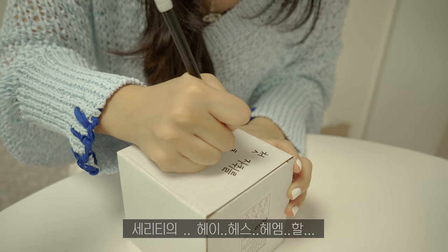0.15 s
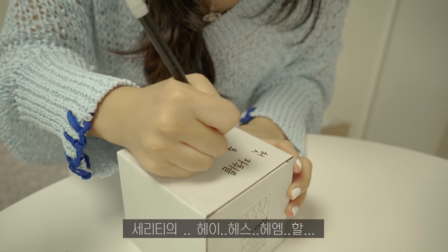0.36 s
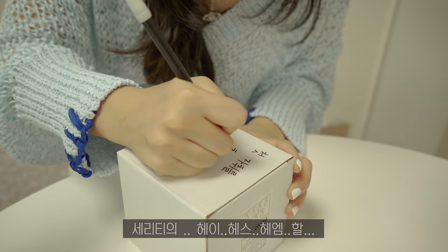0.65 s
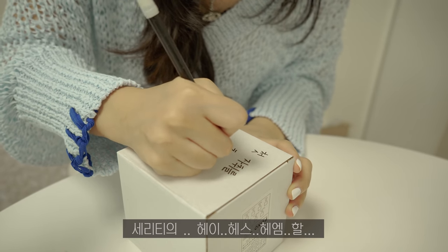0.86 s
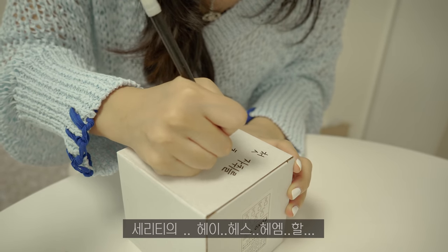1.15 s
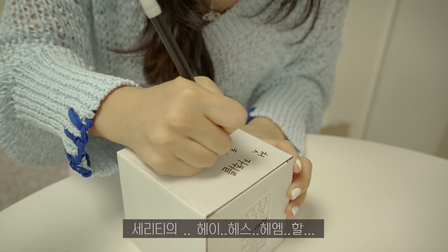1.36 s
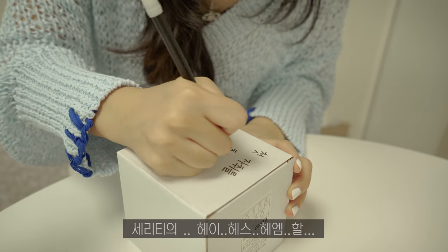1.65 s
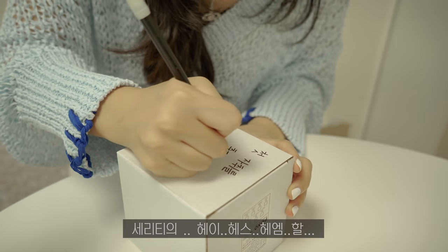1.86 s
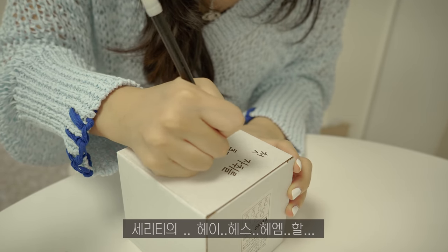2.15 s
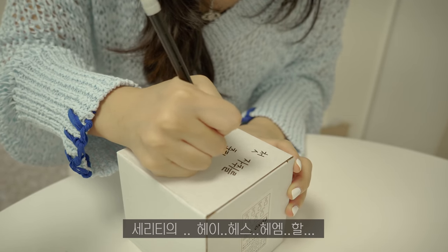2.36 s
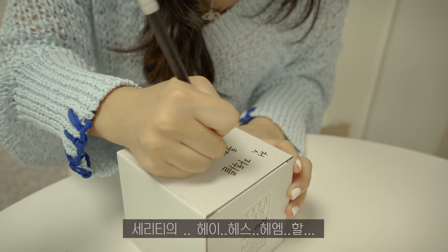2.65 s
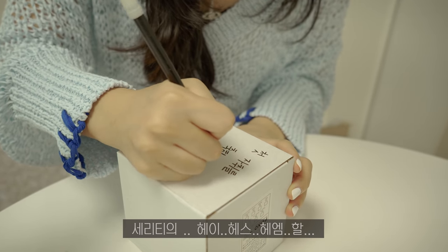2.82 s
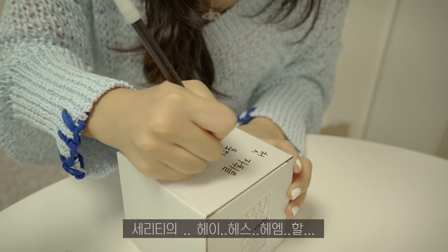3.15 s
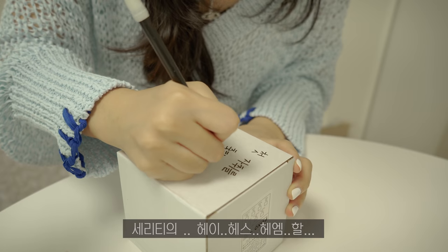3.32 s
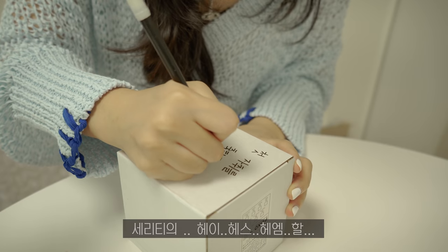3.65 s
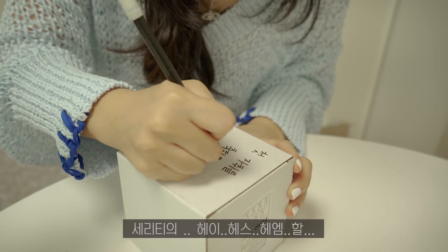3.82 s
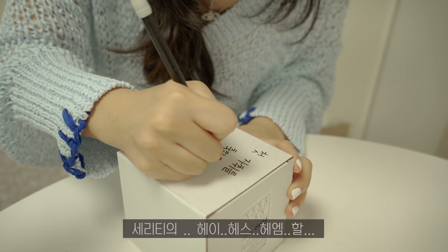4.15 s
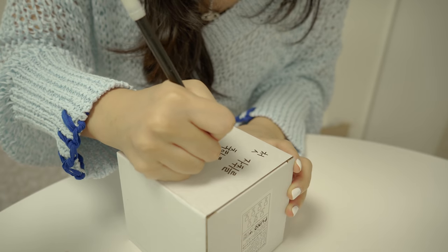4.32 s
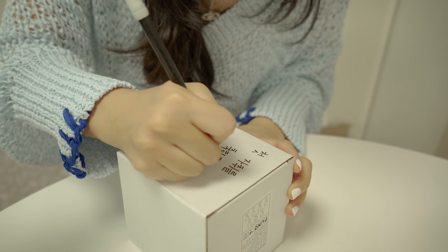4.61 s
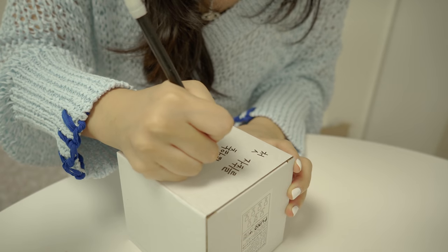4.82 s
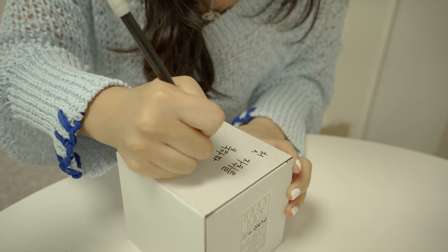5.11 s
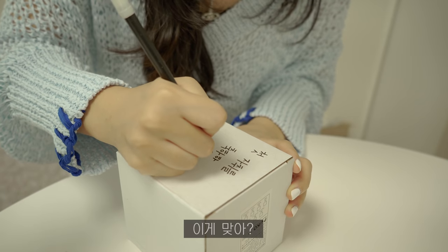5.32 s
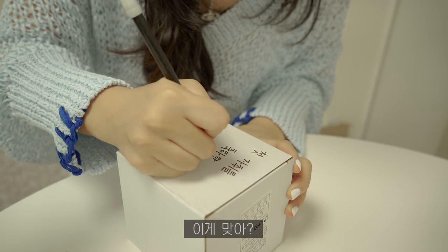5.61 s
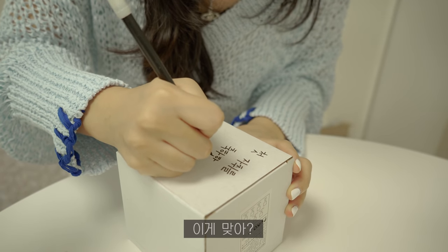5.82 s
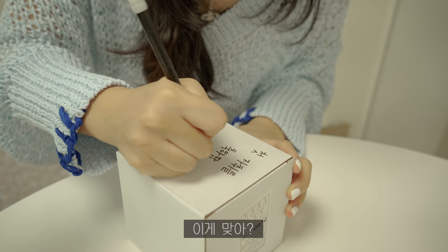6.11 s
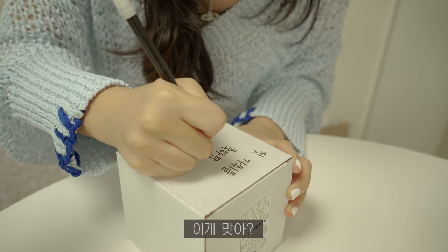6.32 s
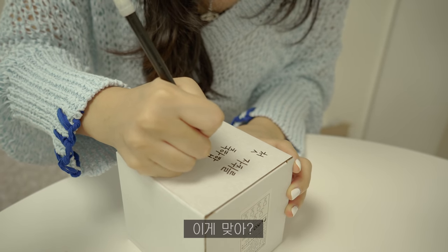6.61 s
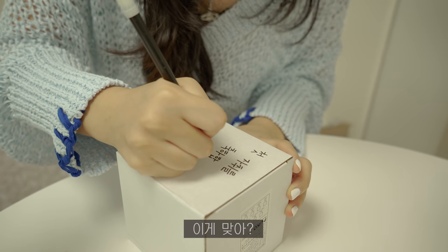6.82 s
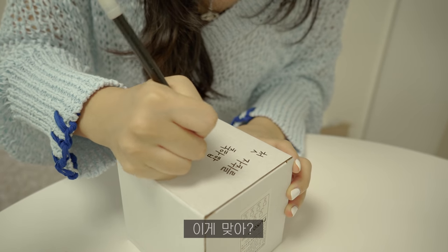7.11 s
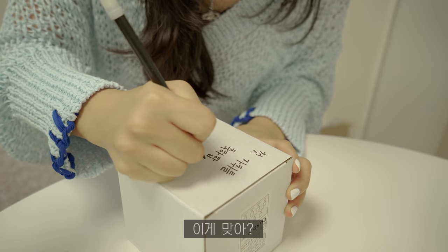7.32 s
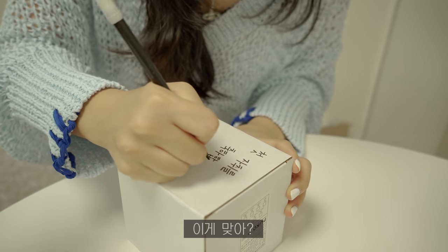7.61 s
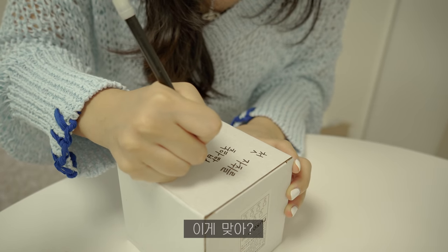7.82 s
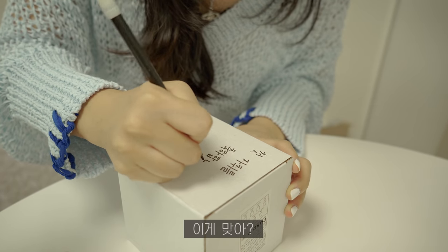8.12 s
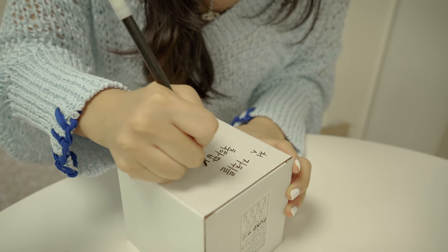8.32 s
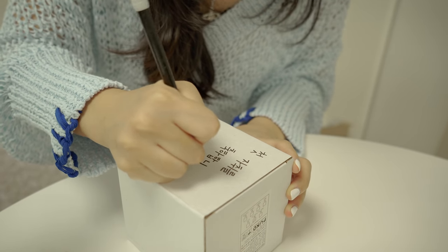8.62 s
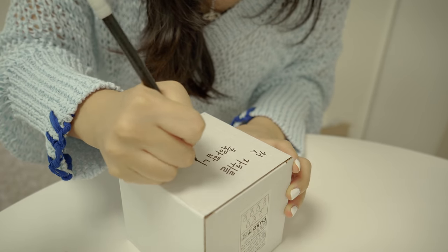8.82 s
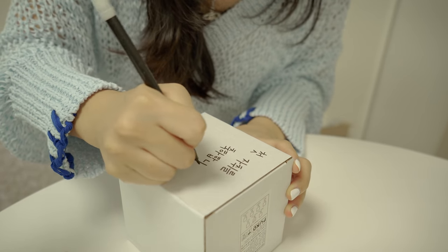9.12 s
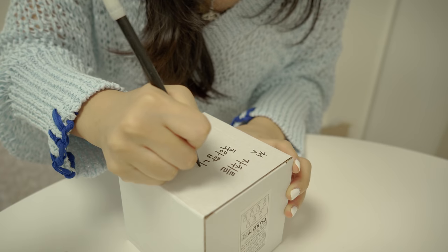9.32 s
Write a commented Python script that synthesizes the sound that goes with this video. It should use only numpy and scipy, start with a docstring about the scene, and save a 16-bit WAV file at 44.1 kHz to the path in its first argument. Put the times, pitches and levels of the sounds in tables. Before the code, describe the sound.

A felt pen scratches short, dry, separated strokes on a small cardboard box, with soft nib taps, hand rustles and low table thumps in a quiet room.

```python
"""A felt pen scratches in short strokes on the lid of a small cardboard box, close to two microphones.
The nib lands with soft taps, then catches on the fibres in dense slips; both ring the modes of the box.
In places the hand hisses and drags along the lid, and tiny dry ticks stand out, all with a short room tail.
Each push rocks the table with a low tone; behind it lie a murmur of air, hiss and a faint wavering hum."""
import sys
import numpy as np
from scipy import signal
from scipy.fft import rfft, irfft, next_fast_len
from scipy.io import wavfile
from scipy.ndimage import uniform_filter1d

SR = 44100
rng = np.random.default_rng(int(sys.argv[2]) if len(sys.argv) > 2 else 0)


def attenuation_scalar(level_db):
    """Turn a level in dB into a linear amplitude multiplier (20 dB per decade)."""
    decades = np.asarray(level_db, float) / 20
    return 10 ** decades


def file_out(sig):
    """Save sig as 16-bit WAV at sys.argv[1]."""
    # one column per channel
    cols = np.atleast_2d(sig).T
    # limit, then scale
    lim = np.clip(cols, -1, 1)
    pcm = np.round(lim * 32767).astype(np.int16)
    wavfile.write(sys.argv[1], SR, pcm)


N = 417186
T = np.arange(N) / SR
LEFT_RIGHT = np.array([[1], [-1]])  # plus for the left microphone, minus for the right


def level(x, db):
    """Scale to an rms level in dB."""
    return x * attenuation_scalar(db) / np.sqrt(np.mean(x ** 2))


def colour(x, points):
    """Shape a spectrum by (Hz, dB) points, joined by straight lines over log frequency."""
    hz, db = np.transpose(points)
    size = next_fast_len(N)
    bins = np.maximum(np.arange(size // 2 + 1) * SR / size, 1)
    gain_db = np.interp(np.log(bins), np.log(hz), db)
    return irfft(rfft(x, size) * attenuation_scalar(gain_db), size)[..., :N]


def ring(x, hz, width):
    """One mode as a complex ring, gain 1 at its centre; a narrower width in Hz rings longer."""
    pole = np.exp((2j * hz - width) * np.pi / SR)
    return signal.lfilter([1 - abs(pole)], [1, -pole], x)


def walk(rate):
    """A slow random wander: a new level every 1 / rate seconds, joined by slopes; spread near 1."""
    k = int(SR / rate)
    held = np.repeat(rng.standard_normal(N // k + 1), k)
    return uniform_filter1d(held, k)[:N]


def nib():
    """Pressure as gain, speed 0-1 and broad side 0-1 over time; speed arches over each stroke."""
    # Strokes: the nib bites at once, leans from a first to a last pressure and lifts.
    # Each row: start in seconds, length in seconds, first and last pressure in dB, top speed from 0 to 1.
    stroke_rows = [(0.064, 0.074, -42, -52.5, 0.85), (0.215, 0.072, -35.5, -34.5, 0.74),
                   (0.854, 0.059, -43.5, -41, 0.93), (1.156, 0.067, -45.5, -38.5, 0.88),
                   (1.538, 0.037, -46.5, -36.5, 0.68), (1.717, 0.019, -32, -28, 0.47),
                   (1.761, 0.027, -44, -52, .4), (2.176, 0.16, -45.5, -35.5, 0.8),
                   (2.642, 0.057, -32, -44.5, 0.54), (3.428, 0.057, -40.5, -53.5, 0.77),
                   (3.74, 0.06, -42.5, -50.5, 0.74), (4.096, .045, -51, -44, 0.33),
                   (4.175, 0.022, -58, -51.5, 0.23), (4.287, 0.064, -42.5, -54, 0.26),
                   (4.718, 0.091, -44, -41, 0.73), (5.021, 0.065, -40.5, -46.5, 0.47),
                   (5.686, 0.067, -43.5, -41, .6), (6.059, .12, -52.5, -41, 0.43),
                   (6.546, 0.043, -40.5, -37, .3), (7.043, 0.069, -36.5, -44, 0.11),
                   (7.836, 0.087, -46, -45, 0.64), (8.022, 0.036, -33.5, -41.5, 0.77),
                   (8.47, 0.15, -36.5, -41, 0.6), (8.594, 0.077, -42.5, -39, 0.08),
                   (8.694, 0.044, -39.5, -51, 0.17), (9.408, 0.041, -38, -47, 0.61)]
    # Jerks: the nib sticks and jerks free.
    # Each row: start in seconds, length in seconds, first pressure in dB, top speed from 0 to 1.
    jerk_rows = [(1.47, 0.017, -36, 0.18), (1.498, 0.045, -46, 0), (1.628, 0.013, -41.5, 0),
                 (1.647, 0.011, -41, 0.3), (1.664, 0.011, -36.5, 0.15), (1.685, 0.014, -33, 0.28),
                 (1.705, 0.0073, -33, 0.4), (4.056, 0.015, -37, 0.16), (4.08, 0.0087, -51, 0.2),
                 (4.222, .014, -56, .3), (4.241, 0.011, -51, 0.45), (4.256, 0.024, -49.5, 0.35),
                 (8.006, 0.013, -29.5, 0.1), (8.12, .025, -57, 0.5)]
    stroke_lift_db_per_s, jerk_lift_db_per_s, jerk_sag_db = 545, 1500, 7.5
    bite_s, lift_slowing_s = 0.0029, 0.06
    speed_at_ends, speed_late = 0.64, 1.11  # share of top speed; over 1 = the peak comes late
    bite_speed, bite_fade_s = 0.16, 0.0057  # the break-away is quick
    broad_from_s, broad_full_s = 0.055, 0.11  # long strokes drag the nib's broad side
    slow_judder_db, slow_judder_hz = 2.5, 109.9

    rows = [(*row, stroke_lift_db_per_s) for row in stroke_rows]
    rows += [(s, length, db, db - jerk_sag_db, top, jerk_lift_db_per_s) for s, length, db, top in jerk_rows]
    gain, moving, sideways = np.zeros((3, N))
    for s, length, first_db, last_db, top, lift in rows:
        part = slice(int(s * SR), int((s + length + 50 / lift) * SR))
        t = T[part] - s
        along = np.clip(t / length, 0, 1)
        after = np.maximum(t - length, 0)
        press = attenuation_scalar(first_db) + (attenuation_scalar(last_db) - attenuation_scalar(first_db)) * along
        press = press * np.clip(t / bite_s, 0, 1) * attenuation_scalar(-lift * after)
        gain[part] += press
        # speeds are averaged by pressure where strokes overlap
        arch = np.abs(np.sin(np.pi * along ** speed_late))
        stroke_speed = top * (speed_at_ends + (1 - speed_at_ends) * arch)
        moving[part] += press * stroke_speed * np.exp(-after / lift_slowing_s)
        moving[part] += press * bite_speed * np.exp(-t.clip(0) / bite_fade_s)
        sideways[part] += press * np.clip((length - broad_from_s) / (broad_full_s - broad_from_s), 0, 1)
    broad = sideways / (gain + 1e-9)
    speed = moving / (gain + 1e-9)
    # a slow nib moves in fits
    fits_db = slow_judder_db * np.clip(1 - 2 * speed, 0, 1) * walk(slow_judder_hz)
    return gain * attenuation_scalar(fits_db), speed, broad


def slips(rate, spread_db, judder_db, judder_rate):
    """Fibres let go at random, rate times a second, mostly weakly and a few hard, in juddering bursts."""
    chance = rng.random((3, N))
    lets_go = chance[0] < rate / SR
    size = attenuation_scalar(-spread_db * np.log(chance[1] + 1e-9)) * np.sign(chance[2] - 0.5)
    return level(lets_go * size * attenuation_scalar(judder_db * walk(judder_rate)), 0)


def taps():
    """The nib lands, lifts or snags: half-sine pushes; a longer contact sounds duller."""
    # Each row: start in seconds, strength in dB before the box, contact time in milliseconds.
    tap_rows = [(0.025, -40, 0.88), (0.405, -57, 0.39), (0.815, -41.5, 0.75), (1.111, -42.5, 0.82),
                (1.441, -45, 0.84), (1.65, -38, 0.36), (1.655, -50, 0.53), (1.71, -44, 0.74),
                (1.731, -41, 0.48), (1.739, -43, 0.74), (2.122, -43.5, 0.93), (2.567, -51, 0.83),
                (2.611, -48, 0.81), (2.877, -52, 0.8), (3.374, -42, 0.9), (3.701, -42, 0.97),
                (4.01, -45, 1), (4.225, -40, 0.51), (4.245, -45, 0.65), (4.263, -39.5, 0.69),
                (4.658, -44, 1), (4.981, -42, 0.98), (5.182, -45.5, 0.57), (6.977, -56, 0.76),
                (7.204, -45, 0.65), (7.798, -45, 0.92), (8.118, -41, 0.47), (8.407, -46.5, 0.89),
                (8.698, -30, 0.44), (8.745, -39, 0.66), (8.765, -41, 0.49), (9.355, -43, 1)]
    force = np.zeros(N)
    for s, db, ms in tap_rows:
        n = ms * SR / 1000
        push = np.sin(np.pi * (np.arange(int(n)) + 0.5) / n)
        start = int(s * SR)
        force[start:start + len(push)] += attenuation_scalar(db + 37.0) * push / push.sum()
    return force


def box():
    """Slips and taps ring the same modes; each microphone hears each mode from its own side."""
    # The ways the box rings. Each row: frequency in Hz, width in Hz, level in dB, change in dB as the
    # writing crosses the lid, left minus right in dB, left phase lead in radians.
    mode_rows = [(247, 75, -1, -1, -2, 1), (263, 40, 2.5, -1.5, 3, 1), (353, 110, -7.5, -5, -13, 0.86),
                 (455, 67, -3.5, -3, -0.5, -0.025), (551.4, 58, 2, 0.5, -13, -0.4), (673, 50, -9, 0, -4, 1),
                 (853, 52, 1, 3, -21, 0.19), (911, 60, -1, -4, -12, -1.05),
                 (927, 42, -3.5, -6, -8.5, -0.89), (976, 52, -1.5, -2, -4, -0.17),
                 (1150, 60, -8, -22, -1, -0.1), (1226, 96, -3.5, 15, -5, -0.4),
                 (1318, 104, -3, 14.5, -7.5, -0.37), (1448, 146, 4, 1.5, -2.5, -0.12),
                 (1573, 100, -5, 0, 5, -0), (1700, 112, -4, -19.5, -2, -.2), (1830, 81, -5.5, -5, -4, 0.44),
                 (1970, 160, -5, 8, -8, 0.45), (2170, 220, -8, -13.5, -11, 0.3),
                 (2500, 110, -14, -23, -7, 0.17), (2590, 500, -9, -25, -14, 0.21),
                 (3150, 130, 1, 1, -4, -0), (3370, 225, 0, 4, -8, 0.3), (3726, 270, 0.5, 11, -8, 0.47),
                 (4580, 610, 7.5, -6.5, 1.5, 0.32), (5400, 620, 3.5, 2, -7.5, -0.83),
                 (6220, 1030, -5.5, 10, -10, -0.096), (7600, 1500, -2, 3, -4, 0.98),
                 (11000, 2100, -13, 0, -8, -0.68)]
    # Families of modes, from boom to fizz.
    # Each row: lowest and highest frequency in Hz, scratch drive in dB, tap drive in dB.
    family_rows = [(167, 320, 22, -1.5), (333, 583, 24.5, 0.5), (708, 2513, 11.5, -4.5),
                   (2607, 3810, 11, -0.5), (4130, 12400, 4.5, -5)]
    gain, speed, broad = nib()

    def by_speed(rest, full, side):
        """A setting for the nib at rest, at full speed, and what its broad side adds."""
        return rest + (full - rest) * speed + side * broad

    boom_db, sag_db = by_speed(-13.5, -27, -6), by_speed(-15.5, -25, 7)
    tilt_db_per_oct = by_speed(-8, 11, -4.5)
    rasp_db, fizz_db = by_speed(-29.5, -3, 0.5), by_speed(-32.5, -9.5, 1)
    # the middle family has no shared level: there the tilt sets each mode's drive
    shares = (boom_db, sag_db, None, rasp_db, fizz_db)

    scratch = gain * slips(6000.0, 1.8, 1.67, 120.0)
    blows = taps()
    out = 0
    for (lo_hz, hi_hz, scratch_db, tap_db), share_db in zip(family_rows, shares):
        family = 0
        for hz, width, mode_db, cross_db, side_db, lead in mode_rows:
            if not lo_hz < hz < hi_hz:
                continue
            # a faster nib excites the upper lid modes more
            drive_db = tilt_db_per_oct * np.log2(hz / 1200) if share_db is None else share_db
            # it also wanders over each mode's pattern
            drive_db = scratch_db + drive_db + 1.8 * walk(9)
            drive = scratch * attenuation_scalar(drive_db) + attenuation_scalar(tap_db) * blows
            crossing = attenuation_scalar(cross_db * (T / T[-1] - 0.5))
            mode = ring(drive * crossing, hz, width)
            ear_gain = attenuation_scalar(mode_db + LEFT_RIGHT * side_db / 2)
            ear_phase = np.exp(0.5j * lead * LEFT_RIGHT)
            family = family + (ear_gain * ear_phase * mode).imag
        # each family is band-passed, so it sounds only within its own range
        band = signal.butter(4, [lo_hz, hi_hz], "band", fs=SR, output="sos")
        out = out + signal.sosfilt(band, family)
    # the lid also gives as a whole under each tap: one short puff
    puff = signal.lfilter(*signal.butter(2, [200, 1500], "band", fs=SR), blows)
    return out + attenuation_scalar(-23.0 - 1.0 * LEFT_RIGHT) * puff


def hand():
    """Skin hisses over the paper face; the box is dragged a little as the hand breaks loose."""
    # Each row: start in seconds, length in seconds, skin hiss in relative dB, dull drag in relative dB.
    slide_rows = [(0.4, 0.072, -58, -48), (1.859, 0.053, -67, -73), (2.766, 0.089, -59.5, -50),
                  (4.418, 0.087, -73, -74), (5.172, 0.14, -65.5, -51.5), (7.196, 0.093, -64, -47.5),
                  (7.365, 0.049, -71.5, -80), (8.829, 0.082, -65.5, -55), (8.99, 0.075, -73.5, -76)]
    # Tone of the skin hiss. Each row: frequency in Hz, relative level in dB.
    skin_shape = [(400, -20), (800, 2), (1500, 5), (2300, 3.5), (3000, -4.5), (4400, 0.5), (6500, -4),
                  (9000, -0.5), (11500, 0), (13500, -8), (15600, -15.5)]
    drag_shape = [(40, -22), (70, 8.5), (110, 2), (160, -3.5), (250, 4.5), (400, -8), (800, -28.5)]
    early, edge = 0.66, 0.8  # below 1: the hiss peaks early and its ends are steeper
    rise_s, fall_db_per_s = 0.0084, 320

    hissing, dragging = np.zeros(N), np.zeros(N)
    for s, length, hiss_db, drag_db in slide_rows:
        part = slice(int(s * SR), int(s * SR) + SR // 2)
        t = np.maximum(T[part] - s, 0)
        swell = np.abs(np.sin(np.pi * np.minimum(t / length, 1) ** early)) ** edge
        hissing[part] += attenuation_scalar(hiss_db) * swell
        fading_db = drag_db - fall_db_per_s * np.maximum(t - rise_s, 0)
        dragging[part] += np.minimum(t / rise_s, 1) * attenuation_scalar(fading_db)
    near = slips(14000.0, 1.3, 3.0, 90.0) + 0.15 * LEFT_RIGHT * rng.standard_normal(N)
    hiss = level(colour(near, skin_shape), 6.06) * attenuation_scalar(-4.8 * LEFT_RIGHT)
    rumble = rng.standard_normal(N) + 0.76 * LEFT_RIGHT * rng.standard_normal(N)
    drag = level(colour(rumble, drag_shape), 0.33)
    return hissing * hiss + dragging * drag


def ticks():
    """Tiny dry ticks: short noise puffs through two broad rings, a few cycles each."""
    # Each row: start in seconds, peak in dB midway between left and right, centre frequency in Hz.
    tick_rows = [(1.367, -42, 6600), (1.5579, -50, 7120), (1.87, -42, 8800), (2.4495, -49, 9200),
                 (4.486, -52, 10200), (6.2018, -51, 11830), (9.0194, -60, 5400), (1.3555, -48, 8500),
                 (0.4962, -47.5, 1800), (7.2918, -44, 1740), (7.5635, -53, 1830)]
    out = np.zeros(N)
    t = np.arange(300) / SR
    noise = rng.standard_normal((len(tick_rows), len(t)))
    for (s, db, hz), puff in zip(tick_rows, noise):
        once = ring(puff * np.exp(-t / 0.0014), hz, 0.51 * hz)
        burst = ring(once, hz, 0.6 * hz).real
        start = int(s * SR)
        out[start:start + len(t)] += attenuation_scalar(db) * burst / abs(burst).max()
    return out * attenuation_scalar(-1.5 * LEFT_RIGHT)


def room(x, t60_s, wet_db, dull_hz):
    """A short diffuse tail of fading noise, different at each microphone."""
    t = np.arange(SR // 2) / SR
    tail = rng.standard_normal((2, len(t))) * attenuation_scalar(-60 * t / t60_s) * (t > 0.004)
    tail = signal.lfilter(*signal.butter(1, dull_hz, fs=SR), tail)
    tail = tail / np.sqrt((tail ** 2).sum(axis=1, keepdims=True))
    middle = x.mean(axis=0, keepdims=True)
    return x + attenuation_scalar(wet_db) * signal.oaconvolve(middle, tail, axes=1)[:, :N]


def table():
    """A low tone swells with each push and dies away; it comes through the stands, out of step."""
    # Pushes that rock the table on its legs. Each row: time in seconds when the swell reaches full level,
    # frequency in Hz, relative level in dB, hold in seconds.
    push_rows = [(0.08, 32.4, -42.5, .03), (0.207, 32.2, -56, .09), (0.42, 33, -54, 0.074),
                 (0.56, 32.1, -58, 0.048), (0.872, 31.9, -46.5, 0.038), (1.174, 32.5, -46.5, 0.021),
                 (1.502, 31.9, -45.5, .03), (1.71, 34, -58, .02), (1.913, 39.6, -56.5, .02),
                 (2.05, 35.5, -61, .08), (2.196, 35.4, -55, .02), (2.61, 31.1, -52.5, 0.23),
                 (2.98, 31.5, -56, .05), (3.42, 38.14, -51, 0.058), (3.66, 31.44, -66, .01),
                 (3.767, 31.7, -47.5, 0.055), (4.076, 31.9, -50, 0.027), (4.22, 31.76, -60, .03),
                 (4.365, 33.6, -56, 0.0096), (4.49, 36.4, -58, 0.0091), (4.703, 36.76, -53, 0.061),
                 (5.04, 36.05, -52, 0.027), (5.197, 34.16, -51.5, .02), (5.33, 38.8, -62, .1),
                 (5.74, 35.4, -52.5, .02), (6.08, 33.1, -55, .03), (6.56, 32.5, -53, 0.0095),
                 (6.69, 31.6, -57, 0.043), (7.03, 35.54, -57, .05), (7.219, 35, -48.5, 0.0083),
                 (7.332, 32.1, -56.5, 0.069), (7.884, 30.06, -47.5, 0.017), (8.05, 31.9, -60, 0.23),
                 (8.471, 34, -48.5, 0.036), (8.671, 34.8, -62, .02), (8.85, 34.4, -49, .03),
                 (9.034, 31.2, -62, 0.042), (9.418, 38.8, -50, .04)]
    rise_db_per_s, fall_db_per_s, tremor_db = 380, 276, -73.5
    s, hz, db, hold = np.transpose(push_rows)[..., None]
    # the pitch glides from one push to the next
    pitch = np.interp(T, (s + hold / 2)[:, 0], hz[:, 0])
    phase = 2 * np.pi * np.cumsum(pitch) / SR
    t = T[::64]  # coarse steps are enough for a slow swell
    before, after = np.maximum(s - t, 0), np.maximum(t - s - hold, 0)
    pushes = attenuation_scalar(db - rise_db_per_s * before - fall_db_per_s * after)
    tremor = attenuation_scalar(tremor_db + 3.0 * walk(12))
    swing = np.interp(T, t, pushes.sum(axis=0)) + tremor
    return swing * attenuation_scalar(1.5 + 2.3 * LEFT_RIGHT) * np.sin(phase + 0.52 * LEFT_RIGHT)


def air():
    """Room murmur and hiss from shaped noise, and a steady-pitched hum that wavers in level."""
    # Tone of the noise shared by both sides. Each row: frequency in Hz, relative level in dB.
    shared_shape = [(26, -15), (45, -0.5), (60, -3.5), (87, -13.5), (115, -10.5), (160, -9), (205, -9),
                    (240, -6), (275, -14), (440, -14.5), (600, -17.5), (1350, -22.5), (2610, -25.5),
                    (15600, -29)]
    # Tone of the noise opposite in left and right. Each row: frequency in Hz, relative level in dB.
    opposite_shape = [(26, -34), (45, -3), (65, -14), (135, -13), (205, -14.5), (351, -16), (460, -17.5),
                      (617, -18.5), (715, -22), (1720, -25), (2260, -26), (4370, -27), (15600, -29)]
    shared = level(colour(rng.standard_normal(N), shared_shape), -61.5)
    opposite = level(colour(rng.standard_normal(N), opposite_shape), -63.5)
    hum_hz = 133.9
    hum = attenuation_scalar(-71 + 1.0 * walk(3.9)) * np.sin(2 * np.pi * hum_hz * T)
    return shared + LEFT_RIGHT * opposite + hum


def scene():
    """Pen, hand and ticks in the room, over table and air."""
    near = box() + hand() + ticks()
    return room(near, t60_s=0.25, wet_db=-14, dull_hz=2970) + table() + air()


def top_cut(x):
    """Nothing passes above the cut-off."""
    return signal.sosfilt(signal.butter(12, 15750, fs=SR, output="sos"), x)


def record(dry):
    """Turns the finished mix into the sound that is heard."""
    return top_cut(dry)


dry = scene()
out = record(dry)
file_out(out)
```